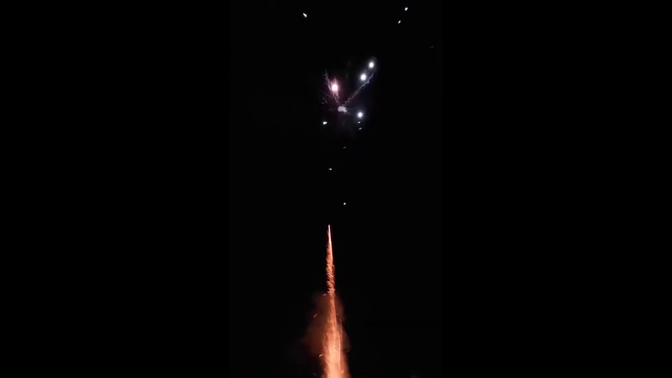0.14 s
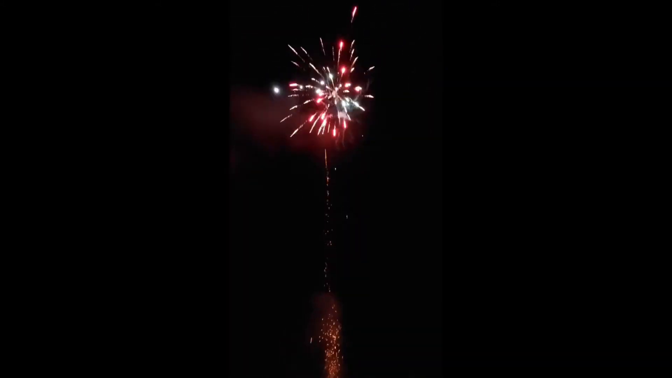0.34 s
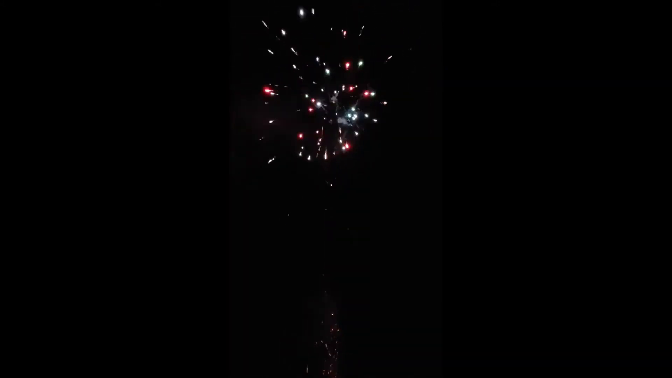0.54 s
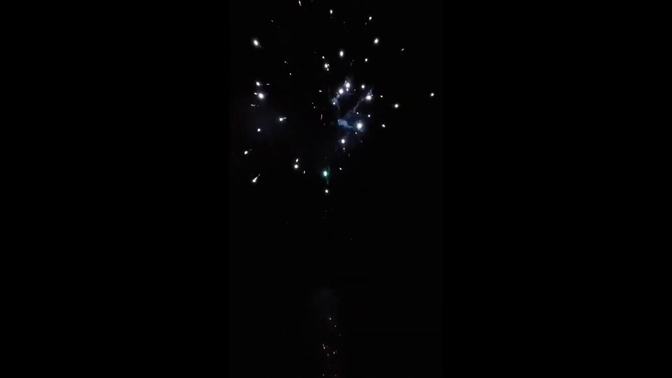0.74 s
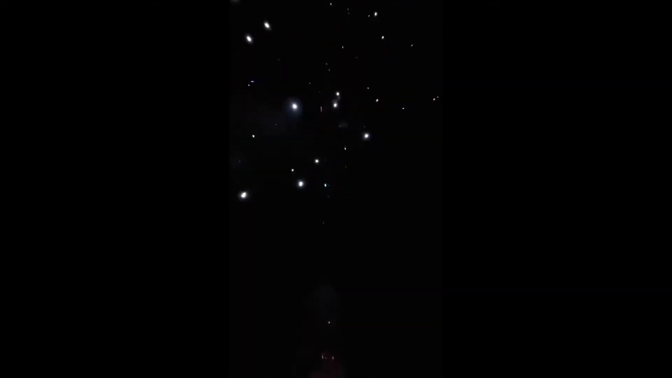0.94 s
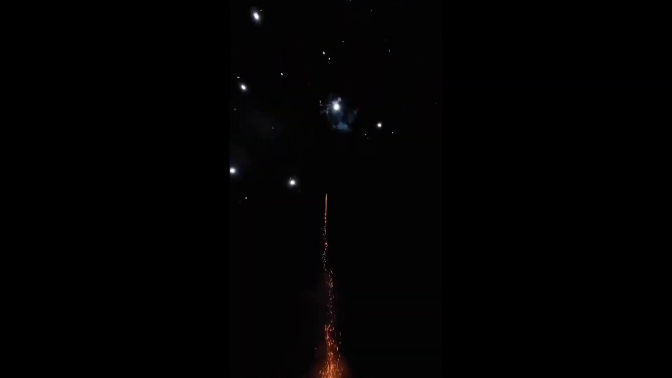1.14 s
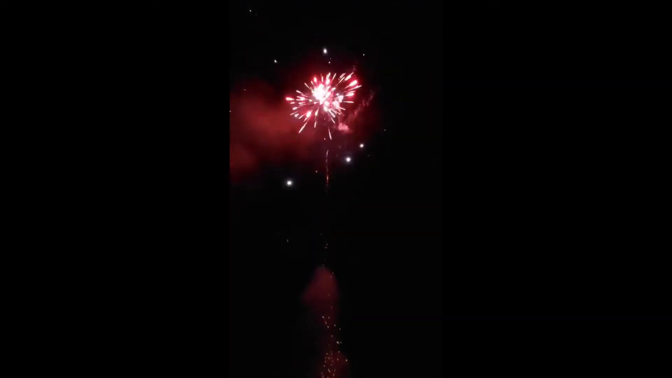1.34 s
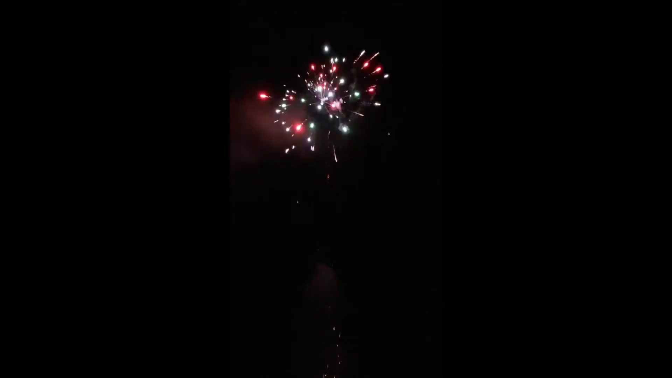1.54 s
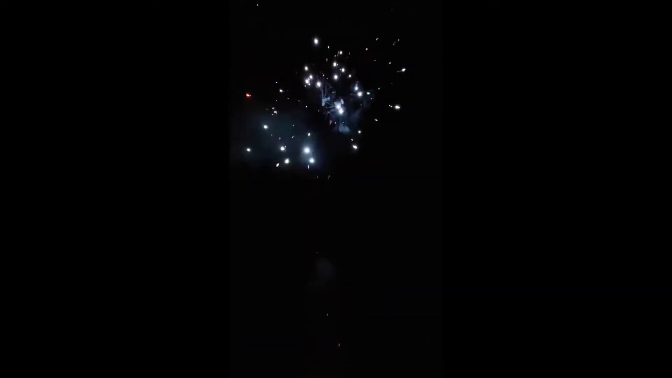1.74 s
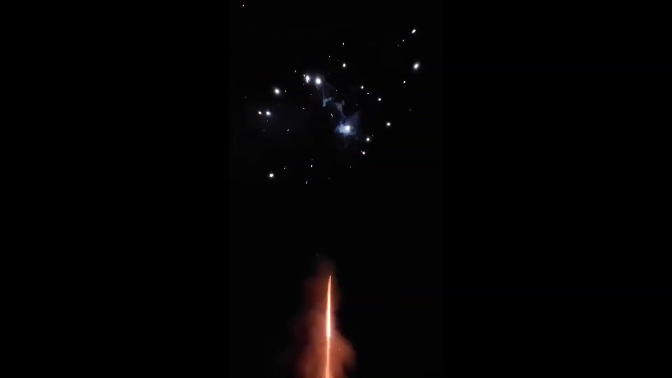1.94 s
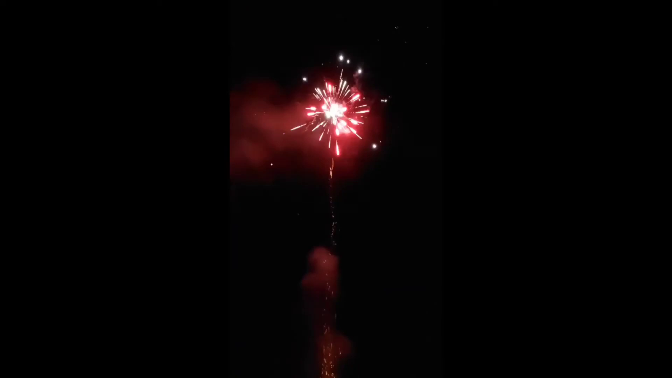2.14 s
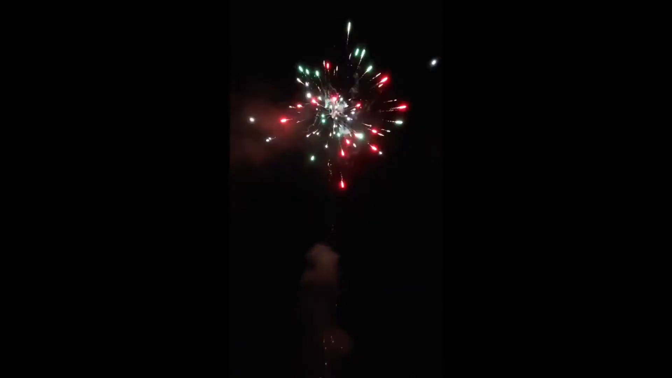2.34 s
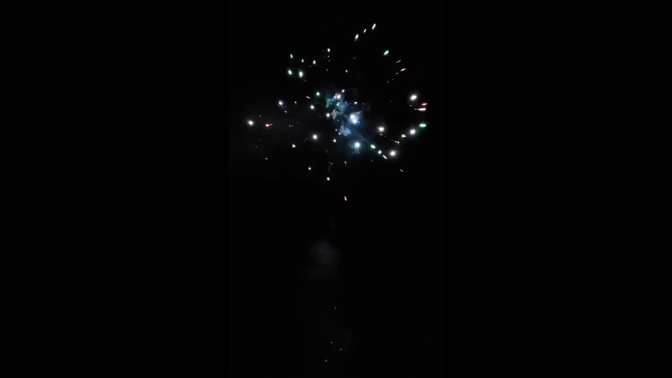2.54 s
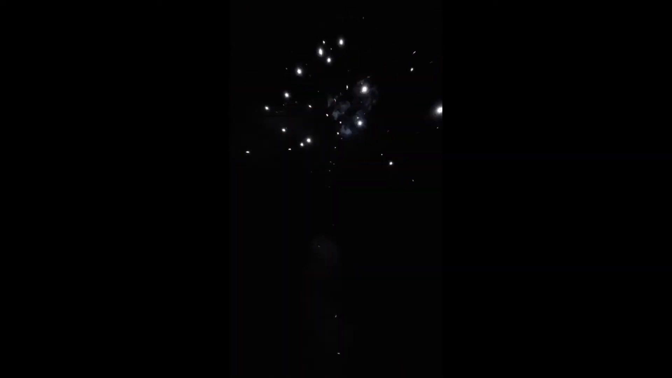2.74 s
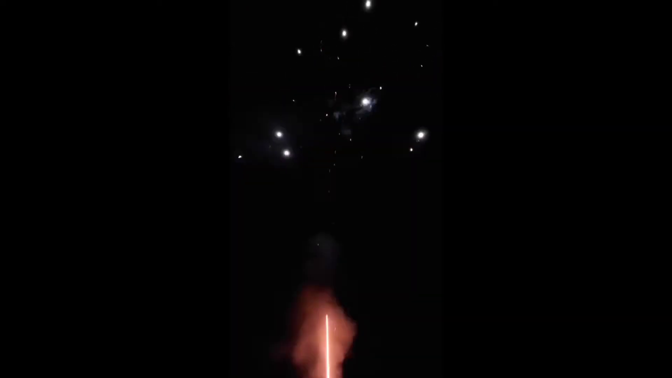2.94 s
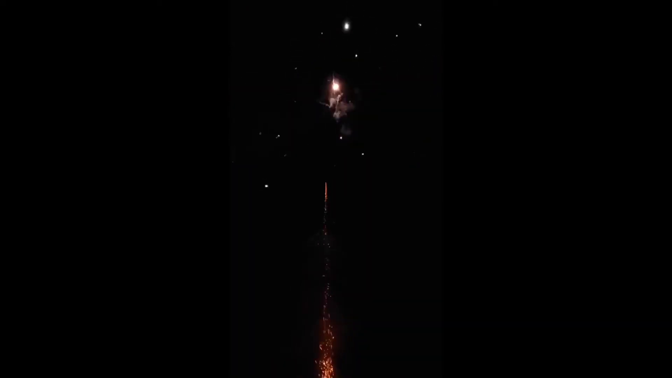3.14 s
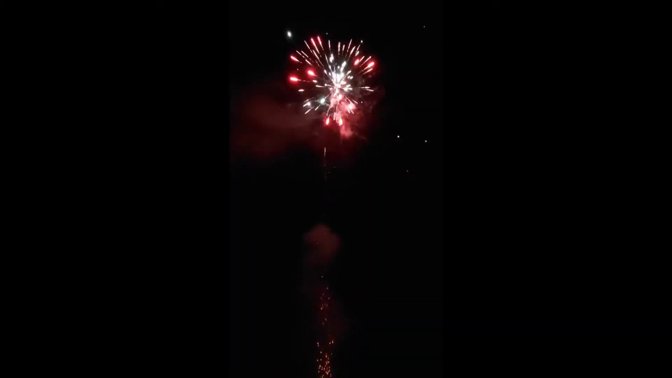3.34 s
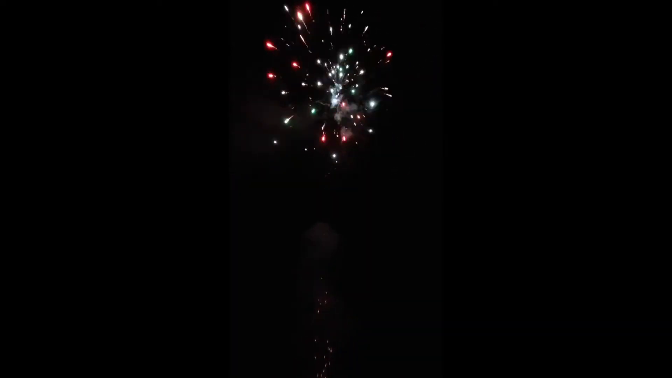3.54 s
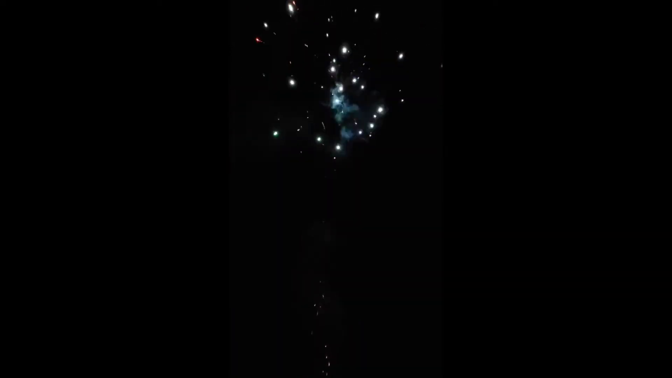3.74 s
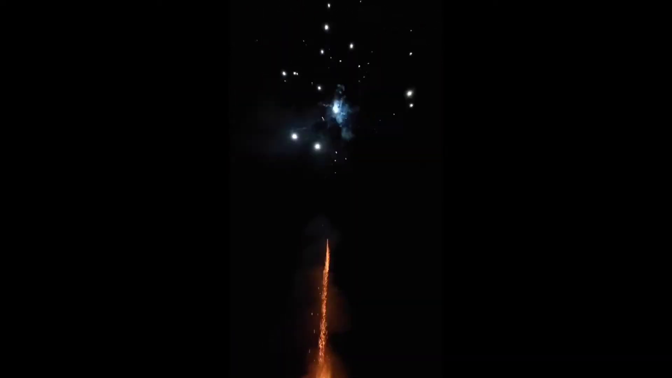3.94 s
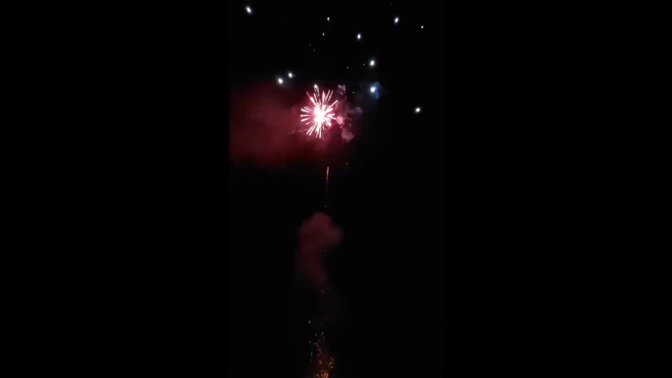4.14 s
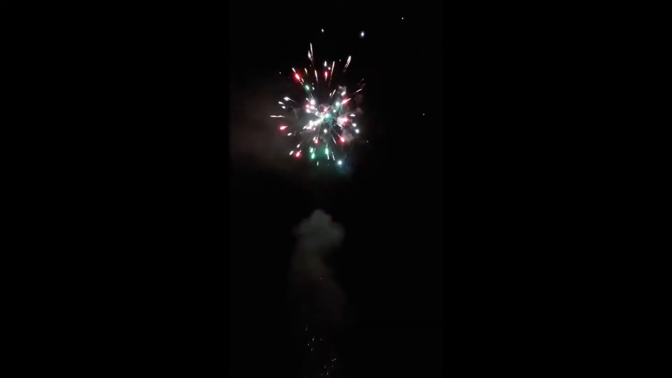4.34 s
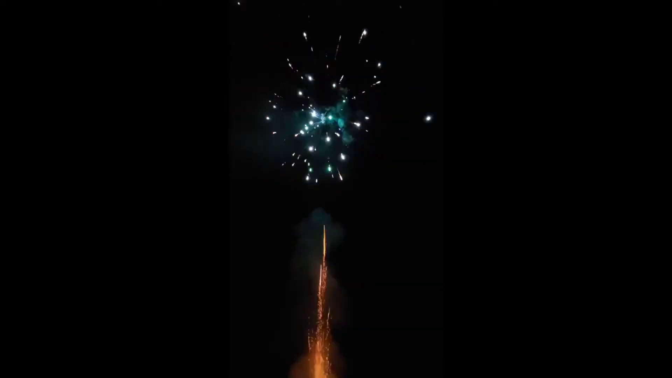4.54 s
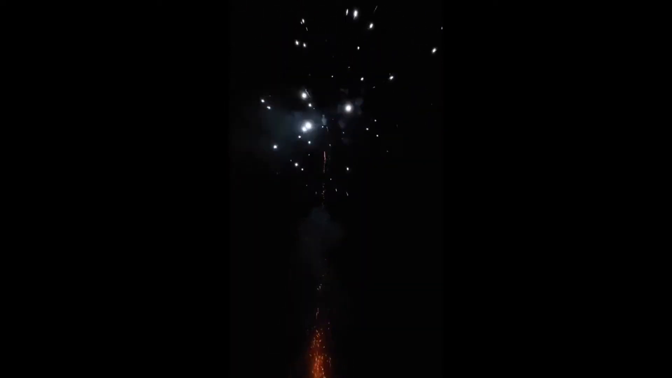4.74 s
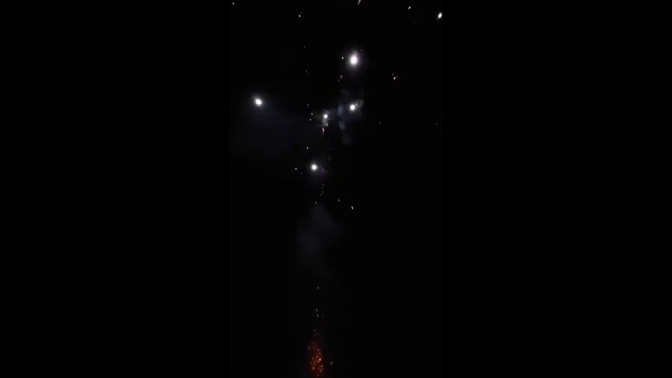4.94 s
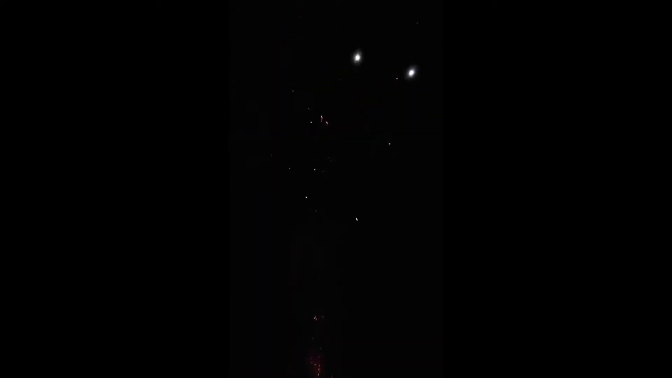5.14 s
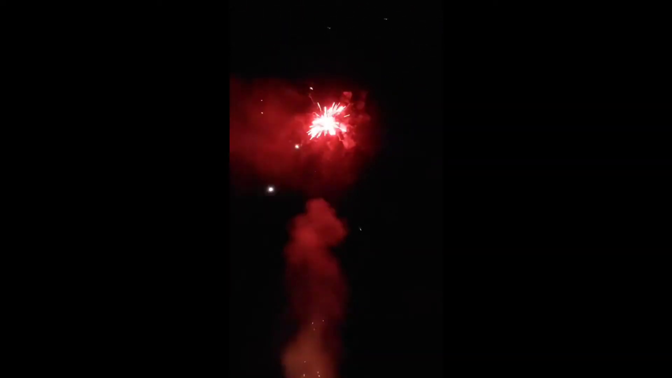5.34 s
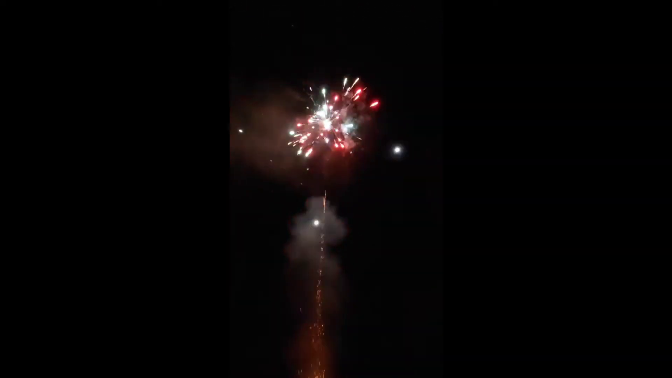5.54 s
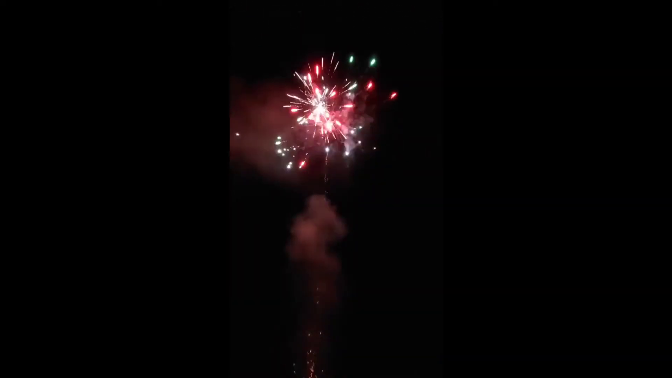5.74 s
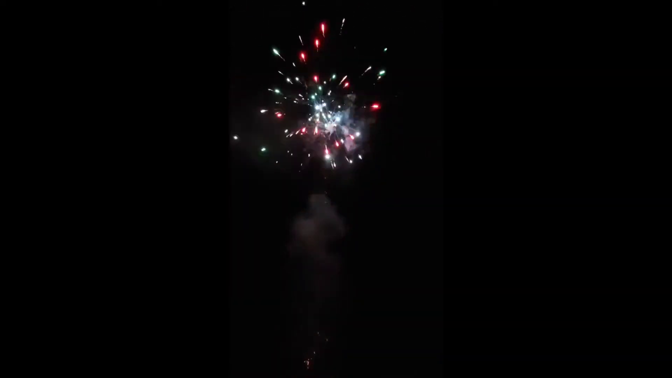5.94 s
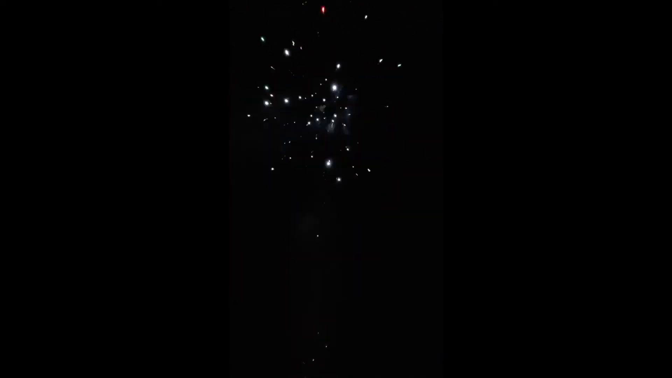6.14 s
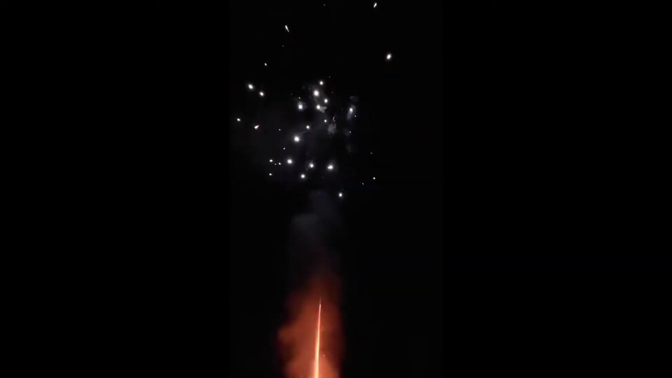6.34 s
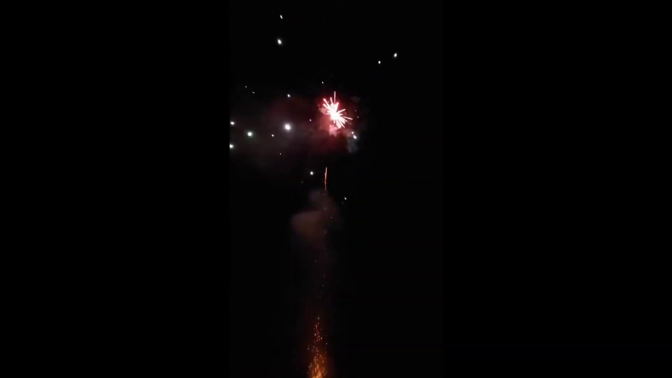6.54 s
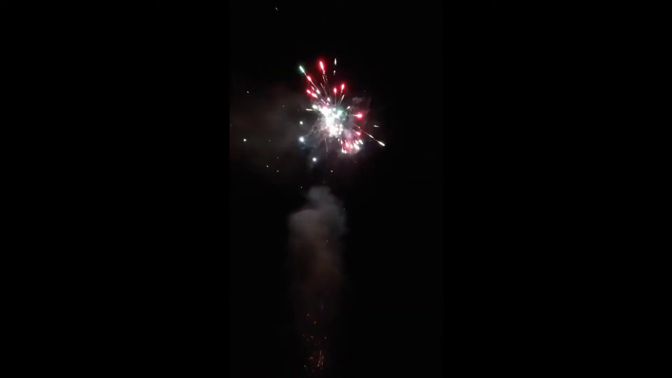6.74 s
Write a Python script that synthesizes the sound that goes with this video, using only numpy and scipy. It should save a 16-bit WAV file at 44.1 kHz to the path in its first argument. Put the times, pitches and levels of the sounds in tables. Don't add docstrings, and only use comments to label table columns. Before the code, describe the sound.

A firework cake fires shot after shot at night, bright launch thumps answered by deeper overhead bursts that echo and roll off between houses.

```python
import sys
import numpy as np
from scipy import signal
from scipy.fft import rfft, irfft
from scipy.io import wavfile
from scipy.ndimage import uniform_filter1d

SR = 44100
rng = np.random.default_rng(int(sys.argv[2]) if len(sys.argv) > 2 else 0)


def level_to_linear(level):
    exponent = np.asarray(level, float) / 20
    return 10 ** exponent


def transcribe(u):
    v = np.clip(np.atleast_2d(u).T, -1, 1)
    q = np.round(v * 32767).astype(np.int16)
    wavfile.write(sys.argv[1], SR, q)


N = 298998
FRAME, HOP = 1024, 256
BIN_HZ = np.fft.rfftfreq(FRAME, 1 / SR)
LEAD, FRONT, TAIL = 660, 9600, 48000
FRONT_MS = (np.arange(FRONT) - LEAD) * 1000 / SR


def evened(x):
    return x / np.sqrt(np.mean(x ** 2) + 1e-20)


def read(curve, hz):
    f, value = np.transpose(curve)
    return np.interp(np.log(hz + 1), np.log(f + 1), value)


def unit(colour):
    return evened(level_to_linear(read(colour, BIN_HZ)))[:, None]


def chance(frames):
    real, imaginary = rng.standard_normal((2, 2, len(BIN_HZ), frames))
    return real + 1j * imaginary


def lumps(frames):
    grain = rng.standard_normal((len(BIN_HZ), frames))
    return evened(uniform_filter1d(uniform_filter1d(grain, 7, 0), 3, 1))


# f/Hz, correlation
LIKENESS = [(60, .93), (130, .85), (290, .65), (640, .25), (1400, -.15), (3000, .02)]
# f/Hz, left minus right level/dB
PORT_TILT = [(100, -.5), (500, .8), (2200, 2.5), (3300, 1), (6000, 3.2), (7200, 2.5), (8600, 6.5),
             (10000, 1.5), (12500, -1.5), (15200, 0)]


def diffuse(magnitude, z):
    same = np.clip(read(LIKENESS, BIN_HZ), -1, 1)[:, None]
    tilt = level_to_linear(read(PORT_TILT, BIN_HZ) / 2)[:, None]
    left = z[0] * tilt
    right = (same * z[0] + np.sqrt(1 - same ** 2) * z[1]) / tilt
    below_top = (BIN_HZ < 15750)[:, None]
    pair = np.array([left, right]) * magnitude * below_top
    return signal.istft(pair / 19.6, nperseg=FRAME, noverlap=FRAME - HOP)[1]


# f/Hz, level/dB per Hz
NIGHT_COLOUR = [(18, -41), (30, -11), (76, -12), (142, -2), (217, -1), (261, -6), (676, -4), (752, -10),
                (7670, -37), (16500, -46)]


def night():
    frames = N // HOP + 5
    field = unit(NIGHT_COLOUR) * level_to_linear(1.5 * lumps(frames))
    return level_to_linear(-56.5) * evened(diffuse(field, chance(frames))[:, :N])


# t/s, level/dB, f/Hz, length/ms
DISTANT_SHELL = (4.207, -43, 115, 10)


def far_boom():
    s, db, hz, ms = DISTANT_SHELL
    age = np.maximum(np.arange(N) / SR - s, 0)
    u = age * 1000 / ms
    sag = 1 - 2 * np.minimum(age, .15)
    return level_to_linear(db) * u * np.exp(1 - u) * np.sin(2 * np.pi * hz * age * sag)


# t/s, left level/dB, right level/dB
CASING_TICKS = [
    (4.7015, -32, -50),
]


def debris():
    out, age = np.zeros((2, N)), np.arange(200) / SR
    for s, *db in CASING_TICKS:
        hiss = np.diff(rng.standard_normal(len(age) + 2), 2)
        tick = hiss * np.exp(-age / .0012)
        out[:, round(s * SR):][:, :len(age)] += level_to_linear(db)[:, None] * tick
    return out


def pressure_swing(paths, cycles, sag_ms):
    swing = np.zeros((2, FRONT))
    for k, (left, right, left_db, right_db, hz) in enumerate(paths):
        age = np.maximum(FRONT_MS - np.array([[left], [right]]), 0)
        sign = 1 if k else -1
        size = sign * level_to_linear([[left_db], [right_db]]) * level_to_linear(1.5 * rng.standard_normal())
        per_ms = hz * rng.uniform(.93, 1.07) / 1000
        u = age * per_ms / cycles
        envelope = u * np.exp((1 - u ** 1.5) / 1.5)
        cycle_count = per_ms * sag_ms * np.log1p(age / sag_ms)
        swing += size * envelope * np.sin(2 * np.pi * cycle_count)
    return swing


def shock_crack(paths, hiss_ahead, crack, treble_db, noise):
    ahead_db, ahead_ms = hiss_ahead
    direct_db, under_db, echo_hz = crack
    direct, echoes = np.zeros((2, 2, FRONT))
    for k, (left, right, left_db, right_db, _) in enumerate(paths):
        age = np.maximum(FRONT_MS - np.array([[left], [right]]), 0)
        crack_db = max(left_db, right_db) + under_db if k else direct_db
        gate = np.minimum(age / .08, 1) * np.exp(-(age / 2.4) ** 3)
        target = echoes if k else direct
        target += level_to_linear(crack_db + treble_db) * gate
    direct += level_to_linear(ahead_db) * np.exp(np.minimum(FRONT_MS, 0) / ahead_ms) * (FRONT_MS < 1)
    dulling = signal.butter(3, echo_hz, fs=SR, output="sos")
    return direct * noise + signal.sosfilt(dulling, echoes * noise)


def low_thud(returns, tone, delays_ms):
    hz, decay_ms, *port_db = tone
    thud = np.zeros((2, FRONT))
    for late_ms, late_db in returns:
        age = np.maximum(FRONT_MS - np.array(delays_ms)[:, None] - late_ms, 0)
        thud += level_to_linear(late_db) * np.sin(2 * np.pi * hz * age / 1000) * np.exp(-(age / decay_ms) ** 2)
    return level_to_linear(port_db)[:, None] * thud


# f/Hz, level/dB per Hz
CRACK_COLOUR = [(300, -14), (900, 2), (1600, 0), (3000, -8), (6000, -12), (9500, -22.5), (12500, -17),
                (16500, -20), (17200, -60)]


def crack_noise():
    colour = level_to_linear(read(CRACK_COLOUR, np.fft.rfftfreq(FRONT, 1 / SR)))
    return evened(irfft(rfft(rng.standard_normal((2, FRONT))) * colour))


def with_walls(paths, walls, wall_db):
    far = []
    for left, right, lean_db, hz in walls:
        level_db = wall_db - .062 * left
        far.append((left, right, level_db + lean_db / 2, level_db - lean_db / 2, hz))
    return paths + far


# f/Hz, level/dB per Hz
ROLL_COLOUR = [(30, -20), (70, -9), (154, -12), (260, -8), (420, 0), (600, -3), (850, -11), (2600, -18),
               (5030, -27.5), (7500, -33), (9480, -40.5), (12500, -39.5), (15200, -43)]
# f/Hz, t60/s
ROLL_DECAY = [(60, 2.4), (400, 2.5), (1500, 2.5), (5000, 2.4), (12000, 2.0)]
# t/s after the shot, level/dB, width/s
HOUSE_ROWS = [
    (.32, 2.5, .02),
    (.5, 3.5, .035),
]


def shots(events, paths, returns, body, wash, t60, wash_db, roll_db, rise_ms, hold_s, comb_db, lumpy_db):
    swing, thud_tone, thud_delays, hiss_ahead, crack = body
    out, frames = np.zeros((2, N + 3 * SR)), TAIL // HOP + 2
    t, age = np.arange(frames) * HOP / SR, np.arange(TAIL) / SR
    place, place_lumps, place_crack = chance(frames), lumps(frames), crack_noise()
    bright = np.clip(np.log2((BIN_HZ + 1) / 700) / 4, 0, 1)[:, None]

    dying = np.maximum(t - hold_s * bright, 0)
    near_decay_db = -60 * dying / read(t60, BIN_HZ)[:, None]
    swell_db = sum(db * np.exp(-((t - s) / width) ** 2) for s, db, width in HOUSE_ROWS)
    far_decay_db = swell_db - 60 * t / read(ROLL_DECAY, BIN_HZ)[:, None]
    far_onset = 1 - np.exp(-t / .08)

    comb_band = np.exp(-((BIN_HZ - 3600) / 1900) ** 2)
    comb = level_to_linear(-comb_db * np.cos(2 * np.pi * BIN_HZ * 1.03 / 1000) * comb_band)[:, None]
    envelope = (1 - np.exp(-age * 1000 / rise_ms)) * np.minimum((TAIL / SR - age) / .3, 1)

    for s, blast_db, near_db, treble_db, low_db in events:
        near = unit(wash) * level_to_linear(wash_db + near_db + treble_db * bright + near_decay_db)
        far = unit(ROLL_COLOUR) * level_to_linear(roll_db + .3 * near_db + far_decay_db) * far_onset
        uneven_db = lumpy_db * (1 - .6 * bright) * evened(place_lumps + lumps(frames))
        field = comb * np.hypot(near, far) * level_to_linear(uneven_db)
        tail = diffuse(field, (place + chance(frames)) / np.sqrt(2))[:, :TAIL]
        at = SR + round(s * SR)
        out[:, at:at + TAIL] += tail * envelope

        noise = (place_crack + crack_noise()) / np.sqrt(2)
        front = pressure_swing(paths, *swing)
        front += level_to_linear(low_db) * low_thud(returns, thud_tone, thud_delays)
        front += shock_crack(paths, hiss_ahead, crack, treble_db, noise)
        out[:, at - LEAD:at - LEAD + FRONT] += level_to_linear(blast_db) * front
    return out[:, SR:SR + N]


# t/s, then level/dB of blast, wash, treble, thud
BURST_EVENTS = [
    (-.7, 0, -1, 0, 0),
    (.3792, .5, .3, 0, 1),
    (1.4112, -.5, -.6, -1, -.5),
    (2.2457, -1, 2, -1, 0),
    (3.3972, .5, -.4, -.5, -2),
    (4.299, 0, 0, 1, 2),
    (5.4764, 1, 0, 1, 3),
    (5.8538, .5, 0, 0, -4),
    (6.7263, -1, -.7, -.5, 4),
]
# left/ms, right/ms, left level/dB, right level/dB, swing f/Hz
BURST_NEAR_PATHS = [
    (.05, .2, -7.5, -2.5, 460),
    (7.0, 7.3, -2.5, -30, 820),
    (6.5, 6.3, -20, -2.5, 530),
]
# left/ms, right/ms, left minus right level/dB, swing f/Hz
BURST_FAR_WALLS = [(20.5, 17.5, 2, 500), (27, 28, 2, 550), (43, 44, -1, 500), (61, 62, -1, 550),
                   (74, 75, 0, 500), (106, 95, 1, 500)]
# t/ms, level/dB
BURST_RETURNS = [(0, 0), (70, -22)]
# direct level/dB, echo level/dB re swing, echo top f/Hz
BURST_VOICE = [
    (.9, 4.1),
    (143, 13, -15, -13.5),
    (1.7, .6),
    (-41, 1.3),
    (-9.5, -17, 4300),
]
# f/Hz, level/dB per Hz
BURST_COLOUR = [(30, -19), (80, -11), (150, -6), (248, -2.5), (608, -1), (1000, -7), (1660, -11),
                (2500, -12.5), (3050, -16.5), (4530, -19.5), (6300, -25), (7300, -24.5), (9300, -32),
                (12300, -27.5), (15200, -32)]
# f/Hz, t60/s
BURST_DECAY = [(60, .3), (300, .55), (1000, .72), (4000, .74), (11000, .51), (15000, .44)]


def bursts():
    paths = with_walls(BURST_NEAR_PATHS, BURST_FAR_WALLS, wall_db=-15.5)
    return shots(BURST_EVENTS, paths, BURST_RETURNS, BURST_VOICE, BURST_COLOUR, BURST_DECAY,
                 wash_db=-19.6, roll_db=-33, rise_ms=7.1, hold_s=.055, comb_db=2.4, lumpy_db=2.0)


# t/s, then level/dB of blast, wash, treble, thud
LAUNCH_EVENTS = [
    (.1968, 2, .5, 0, -2),
    (1.096, -1.5, 0, 1.5, -4),
    (2.0312, 0, -.5, 1.5, -1.5),
    (3.0512, -1.5, .4, 1.5, -.5),
    (3.9791, -.5, 0, -.5, 5),
    (4.5915, 1, -1, -.5, 1),
    (5.4964, -1.5, -1, -.5, -5),
    (6.4638, 1, 2.3, .5, -4),
]
LAUNCH_NEAR_PATHS = [
    (.5, .01, -7.5, -10, 560),
    (2.6, 2.2, -19.5, -11.5, 700),
    (10.4, 10.8, -13, -6, 1350),
    (12.2, 13.6, -13, -14, 1350),
]
# left/ms, right/ms, left minus right level/dB, swing f/Hz
LAUNCH_FAR_WALLS = [(26.5, 26, -3, 600), (38.5, 37.5, 1, 800), (67.5, 66.5, -6, 1400), (74, 75, 2, 700),
                    (103.5, 103, 0, 1200), (113, 113.5, -2, 1100)]
# t/ms, level/dB
LAUNCH_RETURNS = [(0, 0), (43, -14), (65, -18), (143, -22), (161, -27)]
LAUNCH_VOICE = [
    (.9, 5.5),
    (116, 11, -15.5, -15.5),
    (2.0, .5),
    (-26, 2.8),
    (-8, -5.5, 9500),
]
# f/Hz, level/dB per Hz
LAUNCH_COLOUR = [(30, -19), (90, -9), (150, -4), (260, 0), (400, -5), (732, -3.5), (1210, -5), (1600, -6.5),
                 (2200, -8.5), (3000, -12.5), (6200, -23.5), (7300, -23), (9000, -29.5), (12500, -27),
                 (15200, -31)]
# f/Hz, t60/s
LAUNCH_DECAY = [(60, .3), (300, .37), (1000, .44), (3000, .52), (12000, .34)]


def launches():
    paths = with_walls(LAUNCH_NEAR_PATHS, LAUNCH_FAR_WALLS, wall_db=-16.5)
    return shots(LAUNCH_EVENTS, paths, LAUNCH_RETURNS, LAUNCH_VOICE, LAUNCH_COLOUR, LAUNCH_DECAY,
                 wash_db=-17.7, roll_db=-44, rise_ms=3.1, hold_s=.035, comb_db=.3, lumpy_db=1.6)


def scene():
    return night() + far_boom() + debris() + bursts() + launches()


def band_limit(x):
    return signal.sosfilt(signal.butter(12, 16970, fs=SR, output="sos"), x)


def record(dry):
    cut = signal.sosfilt(signal.butter(2, 35, "high", fs=SR, output="sos"), dry)
    soft = np.tanh(cut * .95) / .95
    edge = signal.firwin(255, 16700, window=("kaiser", 9), fs=SR)
    mix = signal.oaconvolve(soft, edge[None], "same")
    return band_limit(mix)


dry = scene()
out = record(dry)
transcribe(out)
```